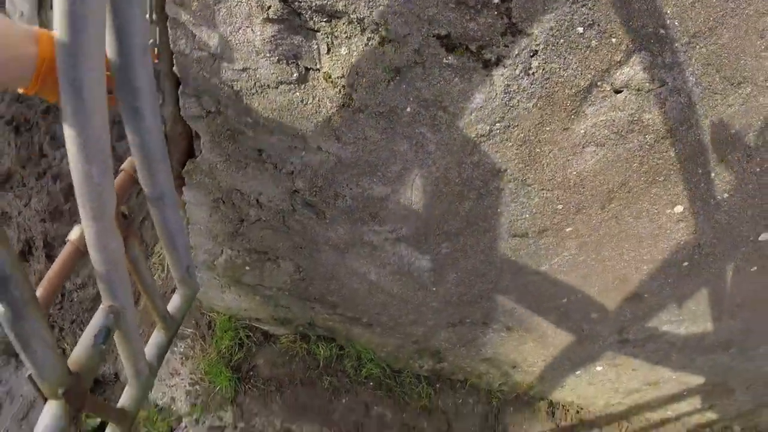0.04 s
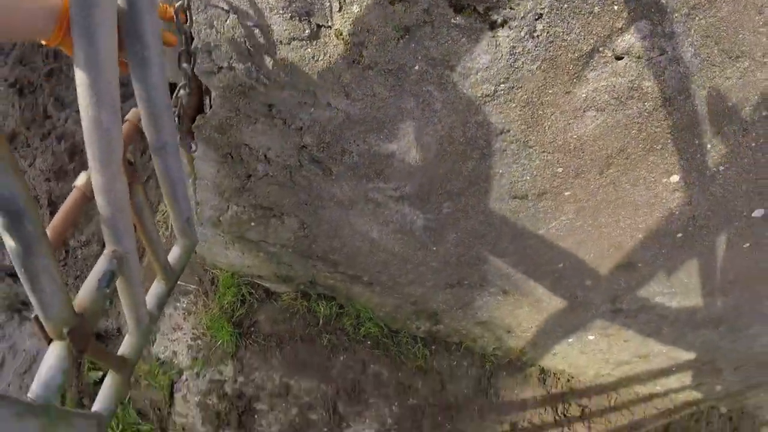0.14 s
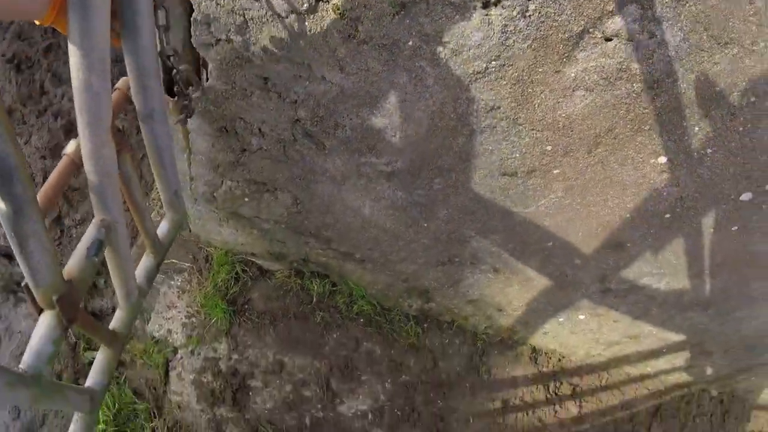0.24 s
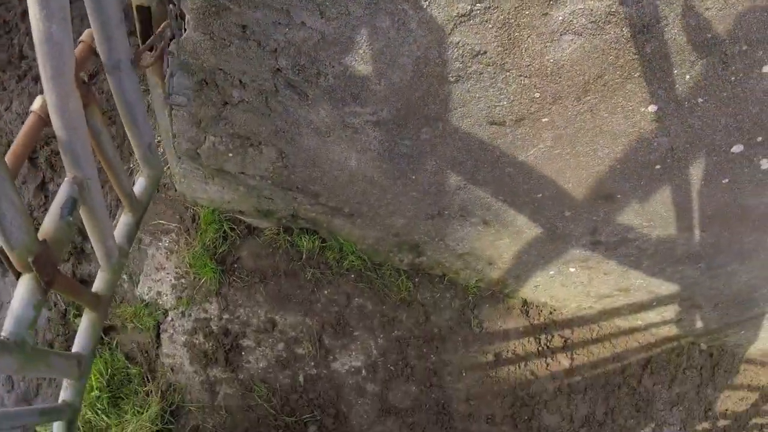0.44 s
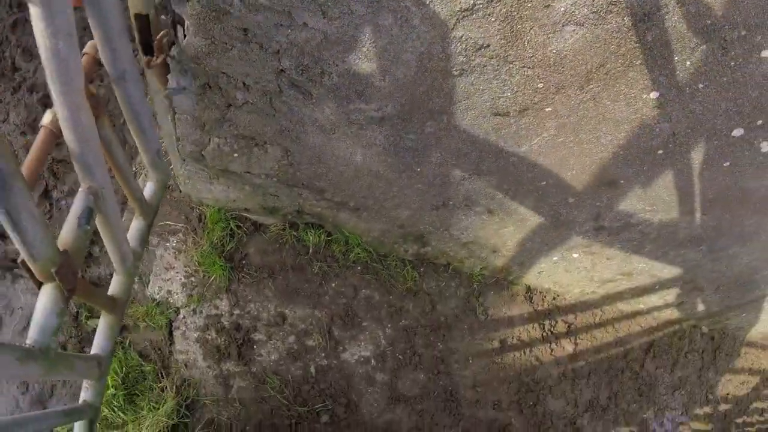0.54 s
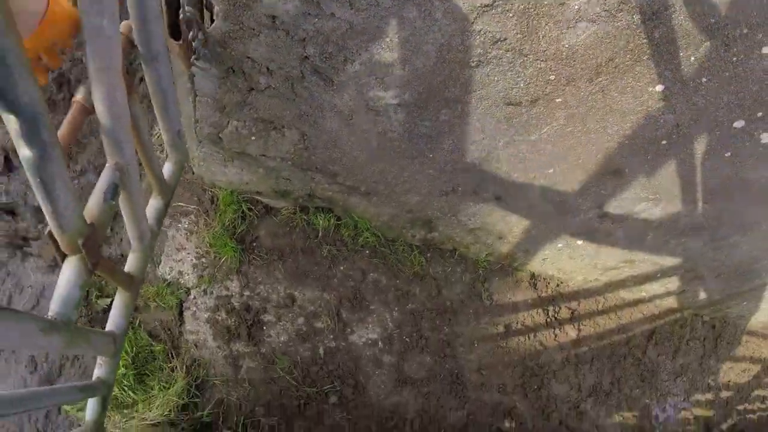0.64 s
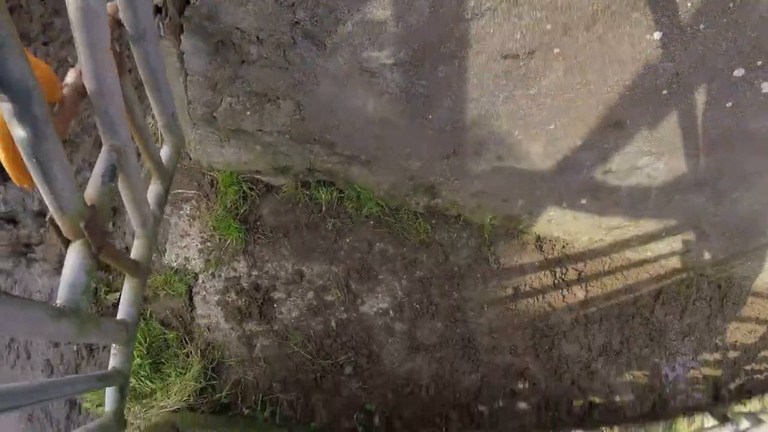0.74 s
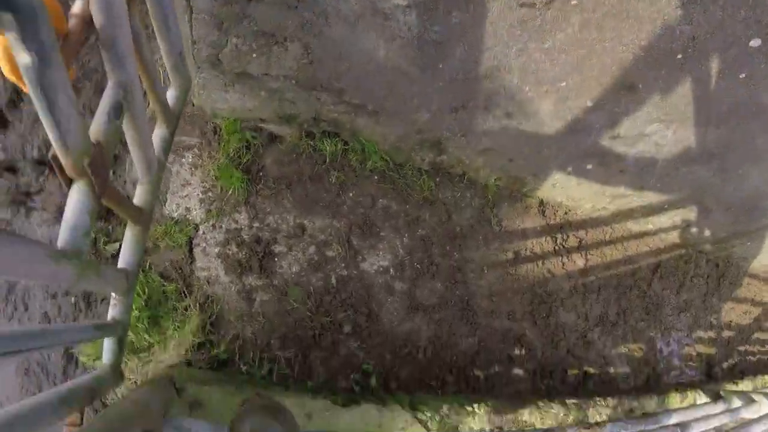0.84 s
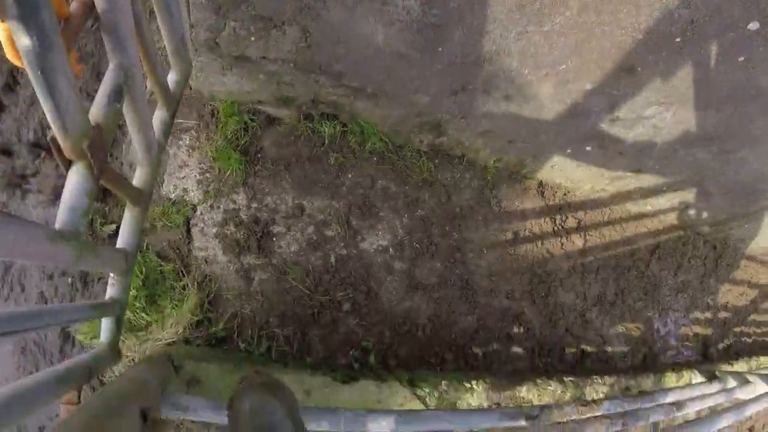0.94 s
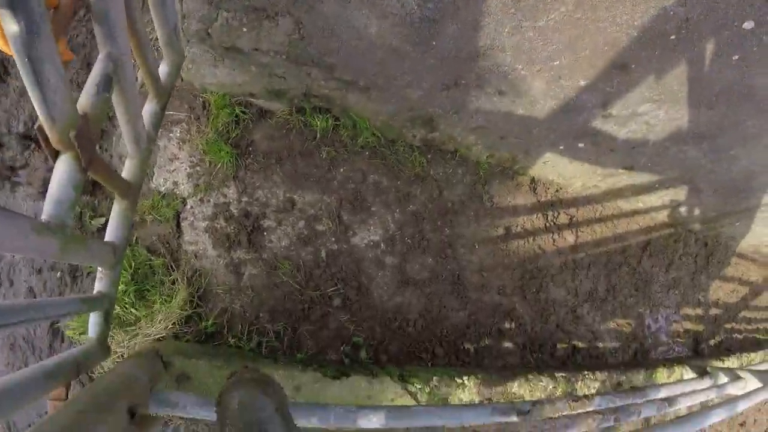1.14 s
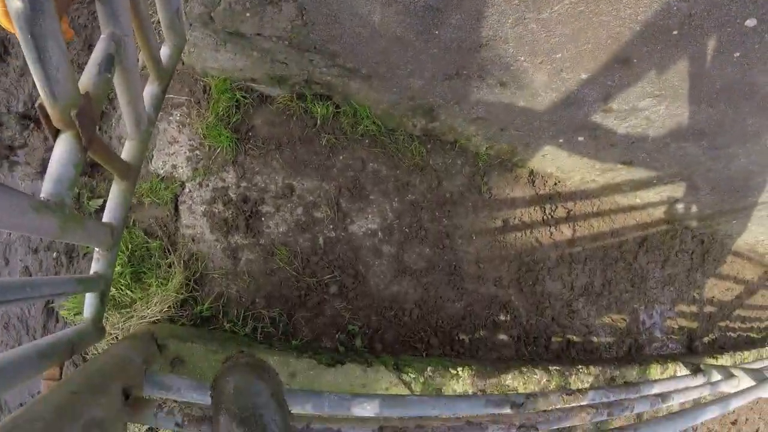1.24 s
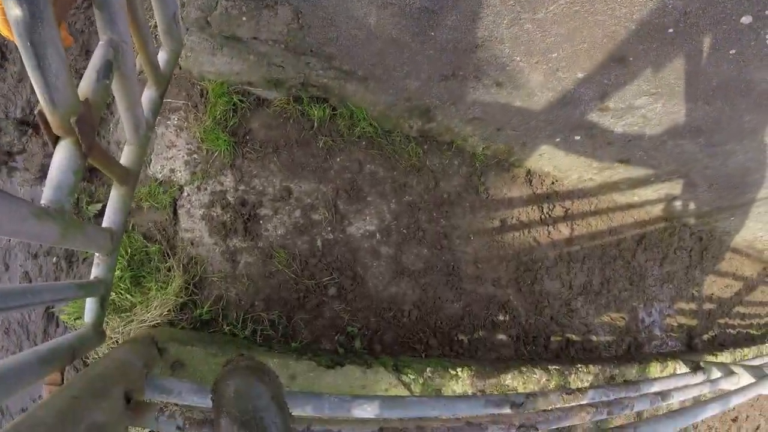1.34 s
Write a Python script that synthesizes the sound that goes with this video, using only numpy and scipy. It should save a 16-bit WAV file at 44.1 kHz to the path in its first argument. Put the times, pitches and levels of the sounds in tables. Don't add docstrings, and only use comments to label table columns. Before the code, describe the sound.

A steel chain rattles against a tubular gate, close and dry outdoors. Light taps and high clinks open; a hard bright clang lands at 0.23 seconds with quick bounces and a short ringing tail. Clattering knocks follow near 0.48 and a lower double clank at 0.73, then dull frame thumps around 0.8-0.97. A sharp hit at 1.0 and smaller knock at 1.13 finish over soft scraping, low wind and faint hiss.

```python
import sys
import numpy as np
from scipy import signal
from scipy.fft import rfft, irfft
from scipy.io import wavfile
from scipy.ndimage import uniform_filter1d

SR = 44100
rng = np.random.default_rng(int(sys.argv[2]) if len(sys.argv) > 2 else 0)


def magnitude_from_level(level_db):
    exponent = np.asarray(level_db, float) / 20
    return 10 ** exponent


def master_out(mix):
    frames = np.transpose(np.atleast_2d(mix))
    ceiling = np.clip(frames, -1, 1)
    pcm = np.round(ceiling * 32767).astype(np.int16)
    wavfile.write(sys.argv[1], SR, pcm)


N = 61739

# f/Hz, density/dB per Hz
WIND_COLOUR = [(110, -21), (150, 4.5), (280, -3), (500, -9), (1400, -15)]
# t/s, wind level/dB, rumble level/dB
GUSTS = [(0, -45.5, -57), (.5, -43.5, -63), (.62, -39.5, -52), (1.05, -41.5, -48), (1.25, -50, -43),
         (1.4, -52, -42.5)]
# f/Hz, density/dB per Hz
HISS_COLOUR = [(300, -10), (1500, -19.5), (15000, -31)]
# t/s, level/dB
SLIDE_LEVEL = [(0, -48.5), (.12, -47.5), (.4, -43), (.7, -46.5), (.83, -43.5), (.88, -48), (1.1, -62),
               (1.22, -79)]
# f/Hz, density/dB per Hz
SCRAPE_COLOUR = [(400, -14.5), (2000, -9.5), (5400, -18.5), (15000, -34)]
# t/s, peak level/dB, f/Hz
THUMPS = [
    (0.806, -27, 437),
    (0.814, -25.5, 384),
    (0.883, -25, 450),
    (0.889, -23, 360),
    (0.912, -24, 425),
    (0.971, -24.5, 177.5),
]
# t/s, peak level/dB, centre f/Hz, decay/s
TICKS = [(.0745, -34, 9000, 0.0011), (0.1555, -20, 2510, 0.0027), (0.161, -32, 7480, .002),
         (0.206, -24, 7500, 0.0011), (0.2142, -14.5, 10500, .0015), (0.214, -20, 3500, 0.0022),
         (0.3498, -11, 5500, 0.0019), (0.4053, -20, 6540, 0.002), (0.4205, -21, 5000, .0015),
         (.431, -31, 6860, 0.0016), (.569, -27, 8500, .0015), (0.611, -24.5, 4000, 0.0029),
         (0.6166, -26, 5860, 0.0018), (0.649, -19, 5000, 0.0019), (0.659, -40, 5340, .002),
         (0.678, -16, 4570, 0.0016), (.7286, -21.5, 8300, 0.0051), (.903, -40, 8200, 0.0039),
         (0.956, -41, 5160, 0.0017), (.994, -29, 2000, 0.0032), (1.0062, -16, 7700, 0.0079)]
SINGING_HZ = [840, 1070, 3976, 3976, 4017, 4057.5, 4057.5, 4760, 1793, 2067, 7600, 7000, 7600, 5500, 7500,
              8650, 5500, 430, 7200, 10640, 13360, 11220, 7569]
SINGING_START = [.231, .231, .234, .305, .236, .238, .295, .305, .153, .156, .006, .33, .353, .442, .541,
                 .684, .679, .728, .972, 1.014, 1.008, 1.01, 1.1535]
# level/dB, hold/s, t60/s
SINGING = [(-39.5, 0.013, 0.47), (-27, 0.019, 0.44), (-19, 0.027, 0.11), (-35.5, 0.054, 0.32),
           (-17.5, 0.056, 0.28), (-27.5, .018, 0.057), (-29.5, 0.059, 0.62), (-33, 0.015, 0.19),
           (-38.5, 0.033, 0.22), (-42, 0.017, .15), (-50, 0.017, .1), (-46, 0.018, .08), (-44, .006, .05),
           (-43, .015, .12), (-45, .006, 0.05), (-49, .008, 0.074), (-26.5, 0.0046, 0.033),
           (-38.5, 0.039, 0.11), (-54.5, 0.013, .08), (-31.5, 0.013, 0.41), (-44.5, 0.023, 0.29),
           (-44, .03, .3), (-48, 0.0054, .15)]
# t/s, peak level/dB
TOP_HITS = [
    (0.2298, -4),
    (0.2342, -14.5),
    (0.2466, -15.5),
    (0.262, -16),
]
MID_HITS = [
    (0.438, -34.5),
    (0.4763, -17.5),
    (0.482, -9.5),
    (0.4881, -12.5),
    (.506, -20.5),
    (0.54, -27.5),
    (.627, -32),
    (0.6782, -31.5),
]
LOW_HITS = [
    (0.725, -8),
    (0.744, -8.5),
]
POST_HITS = [
    (0.0, -25),
    (0.0058, -18),
    (0.0193, -29),
    (0.071, -32),
    (1.004, -9),
    (1.0107, -24),
    (1.0385, -27),
]
LATCH_HITS = [
    (0.1643, -23.5),
    (1.1272, -16),
    (1.138, -22.5),
    (1.1535, -30.5),
]
TOP_HZ = [996, 1150, 1863, 2100, 4700, 5190, 5312, 5566, 5640, 6955, 7900]
MID_HZ = [520, 880, 1707, 1900, 2195, 2536, 4027, 4350, 4581, 4735, 5502, 7531]
LOW_HZ = [271, 1072, 1350, 1475, 1618, 1927, 2080, 2740, 2988, 5080]
POST_HZ = [1350, 1475, 1782, 1970, 2223, 3020, 3122, 4931, 5163, 5410, 5776, 8818]
LATCH_HZ = [258, 436, 1061, 1347, 1782, 1922, 2288, 2821, 3445, 4743, 5125, 5529]
# level/dB, t60/s
TOP_MODES = [(-24, .3), (-24, .2), (-15, .35), (-8, .1), (-16, .25), (-12, .2), (-7, .2), (-4, .22),
             (-5, .22), (-18, .25), (-12, .08)]
MID_MODES = [(-8, 0.068), (-7, 0.09), (-9, 0.3), (-5, .15), (-2, 0.19), (-18, 0.1), (-2, 0.36), (-11, 0.2),
             (-7, 0.25), (-6, .2), (-8, 0.17), (-14, 0.057)]
LOW_MODES = [(-5, .15), (-4, .12), (-7, .3), (-1, .13), (-5, .2), (-10, .2), (-10, .15), (-4, .1),
             (-5, .11), (-10, .11)]
POST_MODES = [(-17, .3), (-9, .15), (-3, .12), (-9, .09), (-5, .075), (-6, .13), (-6, .13), (-3, .088),
              (-4, .13), (-3, .1), (-8, .09), (-11, .075)]
LATCH_MODES = [(-3, .1), (-12, .12), (-12, .08), (-12, .4), (0, .11), (-5, .1), (-13, .12), (-8, .09),
               (-10, .06), (-16, .13), (-5, .13), (-11, .11)]
# f/Hz, density/dB per Hz
TOP_CLANG = [(700, -19), (1100, -11), (2100, 1), (4200, -6), (5600, 4), (8000, -4.5), (14500, -11)]
MID_CLANG = [(400, -24), (2000, -3.5), (3000, -7.5), (4500, 0.5), (6000, -5.5), (8000, -18), (11000, -41)]
LOW_CLANG = [(600, -25), (1500, 7), (2900, -5), (5000, -7), (13500, -22)]
POST_CLANG = [(900, -13.5), (1900, 0.5), (3050, 1), (4100, -12.5), (5300, 0.5), (6800, -17), (10000, -12),
              (14500, -47)]
LATCH_CLANG = [(500, -11.5), (1800, 3.5), (3000, -2.5), (4100, -10.5), (5200, -3), (7000, -9.5),
               (9500, -13), (11000, -43)]
# f/Hz, t60/s
CLANG_T60 = [(500, 0.12), (2000, 0.13), (5000, 0.14), (12000, 0.025)]
# level/dB, clear modes level/dB, clang time factor, chatter/s
TUBES = [
    (-11, -1, 1.94, 0.006),
    (-10.5, 0, 1.26, 0.019),
    (-14, 5, 0.66, 0.0042),
    (-13.5, 6.5, 0.67, 0.0024),
    (-12, 9.5, 0.95, 0.0047),
]
# t/s, peak level/dB, free ring/s, side modes level/dB
CHINKS = [(0.0205, -43, 0.027, 11.5), (.042, -44, 0.027, 5), (.0747, -30.5, 0.042, -10),
          (.092, -30, 0.098, -4), (0.1978, -19.5, 0.0083, -6), (.2134, -33, 0.011, 10),
          (0.2294, -21.5, 0.02, 4), (0.263, -26, 0.0097, 6), (.3117, -25, 0.0081, -8),
          (.4058, -10, 0.068, 0), (0.483, -17.5, 0.029, -1), (0.5087, -25.5, 0.1, 4),
          (0.57, -22.5, 0.0096, -8), (.612, -26.5, 0.0087, -3), (.6185, -16, 0.014, -5),
          (.6485, -25, 0.073, 14.5), (.660, -21, .02, -4), (0.7275, -39.5, 0.1, 15.5),
          (1.0056, -24.5, .014, 3.5)]
# f/Hz, level/dB, t60/s
LINK_MODES = [(10620, 0, .5), (11230, -6, .22), (11340, -6, .17), (10560, -8, .1), (12660, -10, .17),
              (12780, -12, .2), (13380, -12, .45), (11450, -9, .08)]


def evened(x):
    return x / np.sqrt(np.mean(x ** 2) + 1e-20)


def read(points, hz):
    f, value = np.transpose(points)
    return np.interp(np.log(hz + 1), np.log(f + 1), value)


def curve(rows, axis):
    rows = np.array(rows)
    return magnitude_from_level(np.interp(np.arange(N) / SR, rows[:, 0], rows[:, axis]))


def lumps(size):
    smooth = uniform_filter1d(rng.standard_normal(N), size=size)
    return evened(uniform_filter1d(smooth, size=size))


def add(mix, s, sound):
    part = mix[max(round(s * SR), 0):][:len(sound)]
    part += sound[:len(part)]


def ring(hz, db, t60, phase, size=SR // 2):
    t = np.arange(size) / SR
    fall_db = db[:, None] - 60 * t / np.maximum(t60, .004)[:, None]
    return (magnitude_from_level(fall_db) * np.sin(2 * np.pi * hz[:, None] * t + phase)).sum(0)


def noise(colour, patchy_db):
    frames, hz = N // 128 + 6, np.fft.rfftfreq(512, 1 / SR)
    real, imag, patches = rng.standard_normal((frames, 257, 3)).T
    patches = uniform_filter1d(patches, size=6, axis=0)
    patches = evened(uniform_filter1d(patches, size=10, axis=1))
    inside = (hz <= colour[-1][0])[:, None]
    level_db = read(colour, hz)[:, None] + min(patchy_db, 3) * patches
    spectrum = (real + 1j * imag) * magnitude_from_level(level_db) * inside
    return evened(signal.istft(spectrum, nperseg=512, noverlap=384)[1][:N])


def hiss():
    return magnitude_from_level(-55.5) * noise(HISS_COLOUR, patchy_db=6.5)


def wind():
    hz = np.fft.rfftfreq(N, 1 / SR)
    white = rfft(rng.standard_normal((2, N)))
    inside = (hz > WIND_COLOUR[0][0]) & (hz < WIND_COLOUR[-1][0])
    body = irfft(white[0] * magnitude_from_level(read(WIND_COLOUR, hz)) * inside, N)
    deep = irfft(white[1] * (hz > 30) / (1 + (hz / 62) ** 6), N)
    gusty = evened(body) * curve(GUSTS, axis=1) * magnitude_from_level(-3.0 + 1.9 * lumps(700))
    rumble = evened(deep) * curve(GUSTS, axis=2) * magnitude_from_level(2.6 * lumps(700))
    return gusty + rumble


def thumps():
    out = np.zeros(N)
    for s, peak_db, hz in THUMPS:
        cycles = np.arange(4000) / SR * hz
        shape = np.minimum(cycles / 0.29, 1) * np.exp(-cycles * hz / 330)
        add(out, s, magnitude_from_level(peak_db + 1.5) * np.sin(2 * np.pi * cycles) * shape)
    return out


def sliding():
    return curve(SLIDE_LEVEL, axis=1) * noise(SCRAPE_COLOUR, patchy_db=5.0)


def ticks():
    out, t = np.zeros(N), np.arange(400) / SR
    bursts = rng.standard_normal((len(TICKS), 400))
    for (s, peak_db, hz, decay), burst in zip(TICKS, bursts):
        hz = np.clip(hz, 1500, 12000)
        b, a = signal.butter(2, [hz * 0.52, min(hz * 1.27, 13800)], "bandpass", fs=SR)
        tick = evened(signal.lfilter(b, a, burst)) * np.exp(-t / max(decay, .0004))
        add(out, s, magnitude_from_level(peak_db - 8.0) * tick)
    return out


def singing():
    t, out = np.arange(N) / SR, np.zeros(N)
    rise_s, beat_crest_s = .003, .3457
    for hz, s, (db, hold, t60) in zip(SINGING_HZ, SINGING_START, SINGING):
        swell = np.clip((t - s) / rise_s, 0, 1)
        fall_db = -60 * np.maximum(t - s - hold, 0) / t60
        out += swell * magnitude_from_level(db + fall_db) * np.cos(2 * np.pi * hz * (t - beat_crest_s))
    return out


def clang_crowd(hz, clang, longer):
    near_share, near_spread = .25, 0.043
    crowd_hz, spread, phase, pick, choice = rng.random((900, 5)).T
    crowd_hz = clang[0][0] + (clang[-1][0] - clang[0][0]) * crowd_hz ** 1.3
    near_hz = hz[(choice * len(hz)).astype(int)] * (1 + near_spread * (2 * phase - 1))
    crowd_hz = np.where((pick < near_share) & (near_hz > 2000), near_hz, crowd_hz)
    t60 = longer * read(CLANG_T60, crowd_hz) * (0.19 + spread)
    crowd = ring(crowd_hz, read(clang, crowd_hz), t60, 2 * np.pi * phase[:, None], size=SR // 4)
    return crowd / np.sqrt(np.mean(crowd[:400] ** 2))


def tube(hits, hz, modes, clang, level_db, ring_db, longer, chatter):
    out, hz, (db, t60) = np.zeros(N), np.array(hz), np.transpose(modes)
    crowd = clang_crowd(hz, clang, longer)
    body = ring(hz, db, t60, 0) / np.sqrt(np.sum(magnitude_from_level(db) ** 2))
    body *= 1 - np.exp(-np.arange(len(body)) / SR / .0018)
    t = np.arange(2000) / SR
    draws = rng.random((len(hits), 2, 2000))
    for (s, peak_db), (when, size) in zip(hits, draws):
        taps = (when < 900 / SR) * (2 * size - 1) * np.exp(-t / max(chatter, .001))
        taps[0] = 1.2
        clatter = signal.fftconvolve(taps / np.linalg.norm(taps), crowd)
        add(out, s, magnitude_from_level(peak_db + level_db + ring_db) * body)
        add(out, s, magnitude_from_level(peak_db + level_db) * clatter)
    return out


def gate():
    hits = [TOP_HITS, MID_HITS, LOW_HITS, POST_HITS, LATCH_HITS]
    pitches = [TOP_HZ, MID_HZ, LOW_HZ, POST_HZ, LATCH_HZ]
    modes = [TOP_MODES, MID_MODES, LOW_MODES, POST_MODES, LATCH_MODES]
    clangs = [TOP_CLANG, MID_CLANG, LOW_CLANG, POST_CLANG, LATCH_CLANG]
    parts = zip(hits, pitches, modes, clangs, TUBES)
    tubes = sum(tube(h, f, m, c, *settings) for h, f, m, c, settings in parts)
    return signal.lfilter(*signal.butter(2, 220, "highpass", fs=SR), tubes)


def links():
    detune, swing, choke_s = .002, 0.0055, 0.0042
    out, (hz, db, t60) = np.zeros(N), np.transpose(LINK_MODES)
    side = (hz > 11000) & (hz < 13000)
    t = np.arange(SR // 2) / SR
    draws = rng.random((len(CHINKS), 3, len(hz), 1))
    for (s, peak_db, free, side_db), (shift, start, speed) in zip(CHINKS, draws):
        waver_hz = 12 + 25 * speed
        waver = swing * hz[:, None] / waver_hz * np.sin(2 * np.pi * (waver_hz * t + shift))
        link_hz = hz * (1 + detune * (2 * shift[:, 0] - 1))
        chime = ring(link_hz, db + side * side_db, t60, 2 * np.pi * start + waver)
        choke = 0.062 + 0.58 * np.exp(-np.maximum(t - free, 0) / choke_s)
        add(out, s, magnitude_from_level(peak_db - 5.5) * chime * choke * np.minimum(t / 0.00051, 1))
    return out * magnitude_from_level(2.1 * lumps(150))


def scene():
    background = hiss() + wind()
    steel = thumps() + singing() + gate()
    chain = sliding() + ticks() + links()
    return (background + steel + chain)[None]


def low_pass(x):
    return signal.sosfilt(signal.butter(12, 15190, fs=SR, output="sos"), x)


def record(dry):
    edge = signal.firwin(255, 14900, window=("kaiser", 9), fs=SR)
    mix = signal.oaconvolve(dry, edge[None], "same")
    return low_pass(mix)


dry = scene()
out = record(dry)
master_out(out)
```